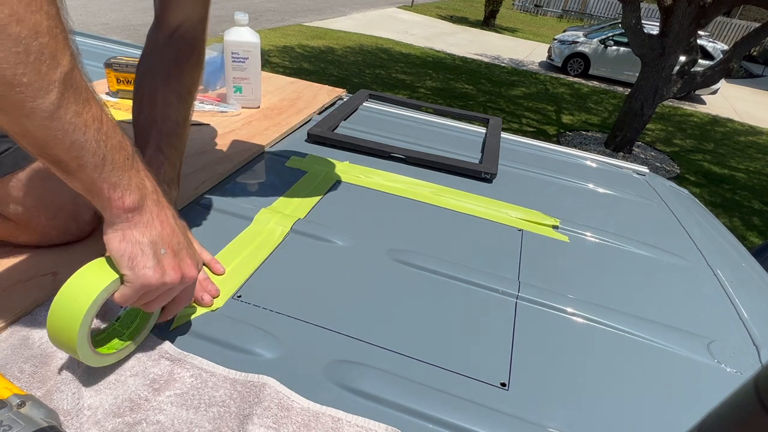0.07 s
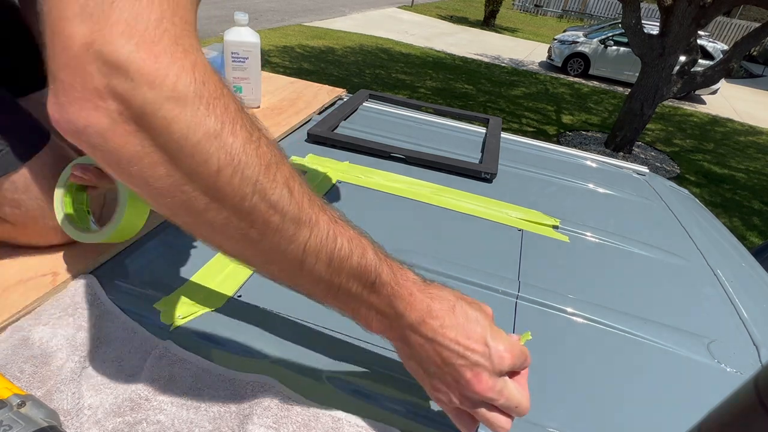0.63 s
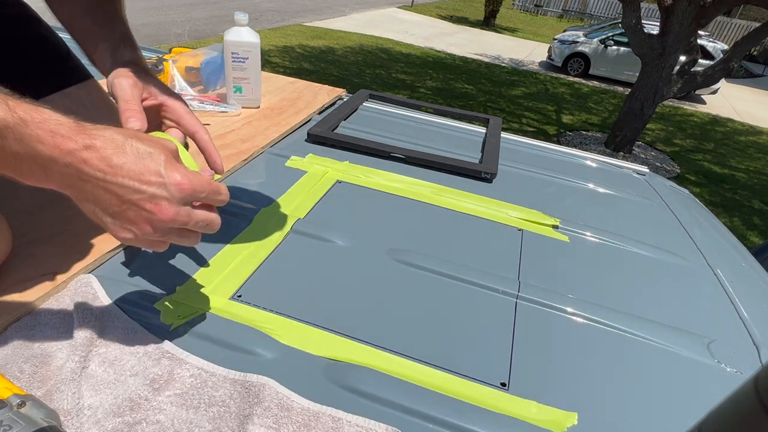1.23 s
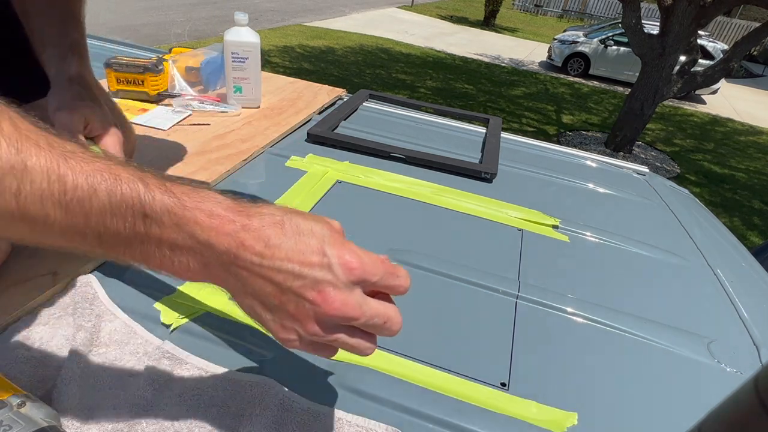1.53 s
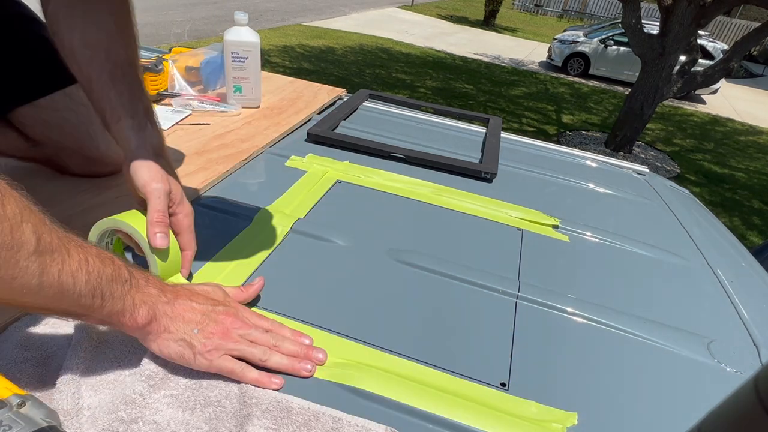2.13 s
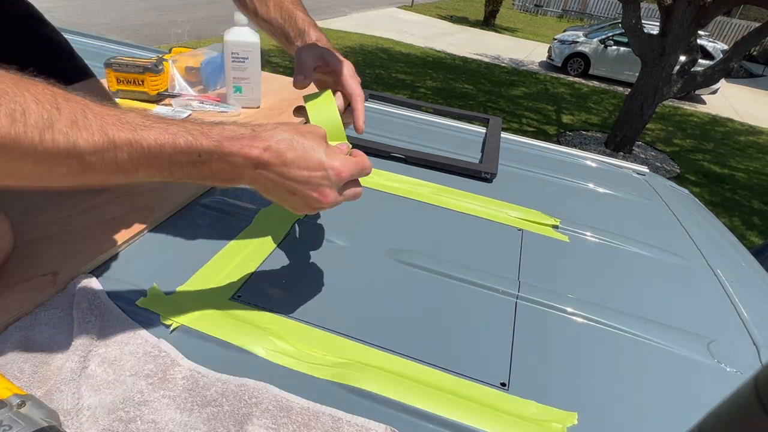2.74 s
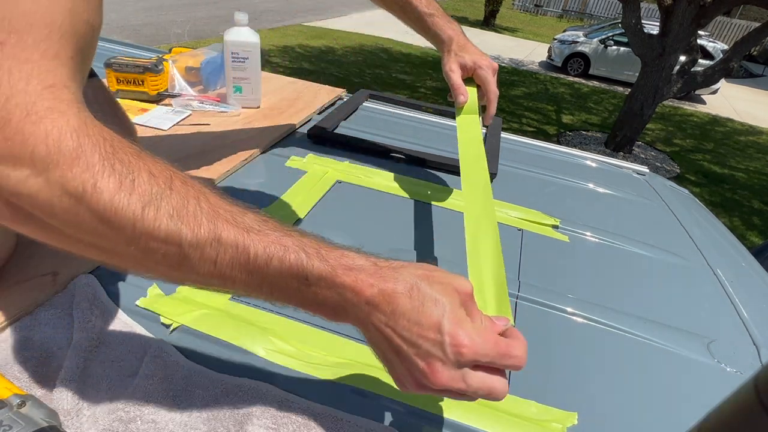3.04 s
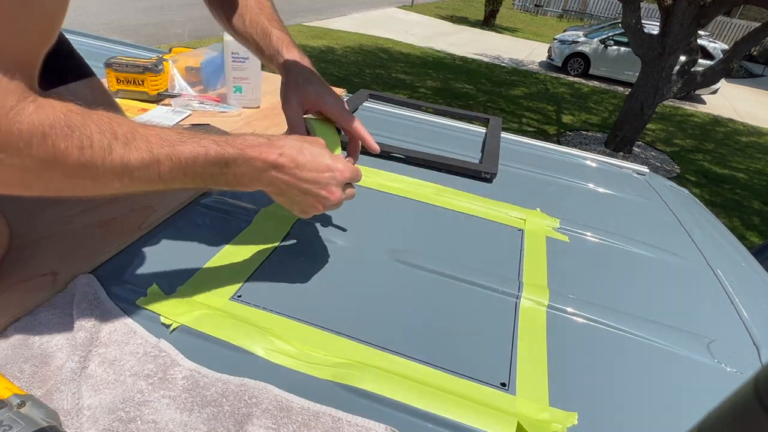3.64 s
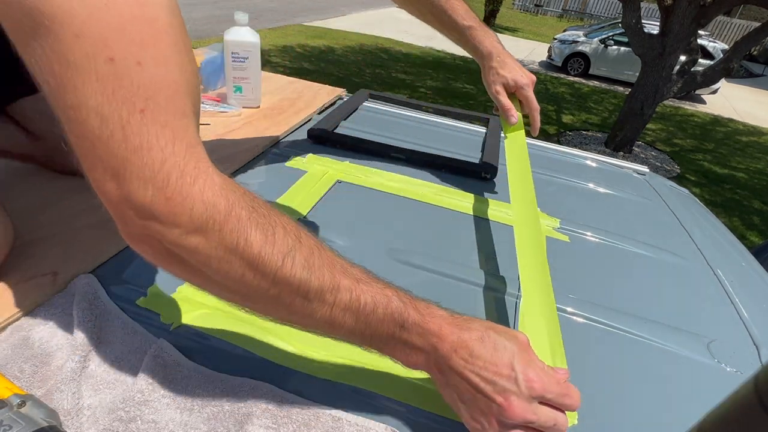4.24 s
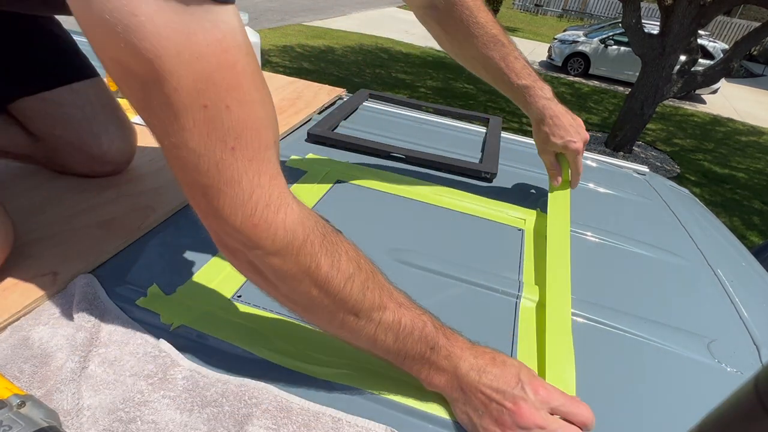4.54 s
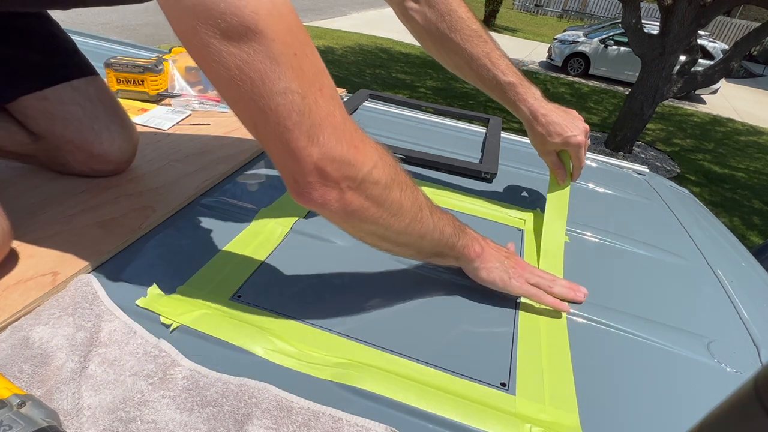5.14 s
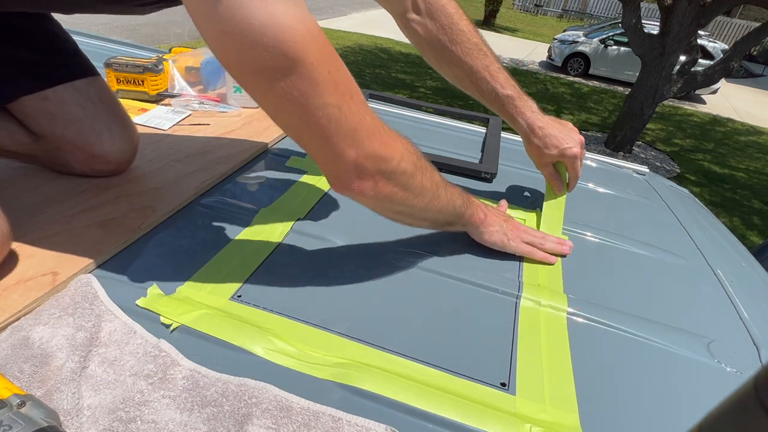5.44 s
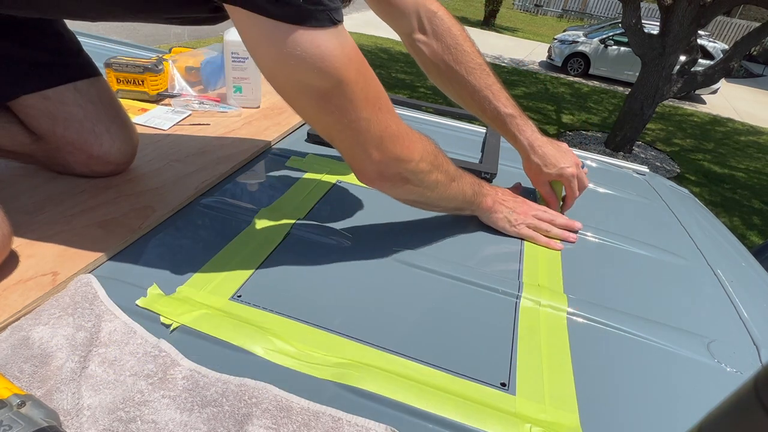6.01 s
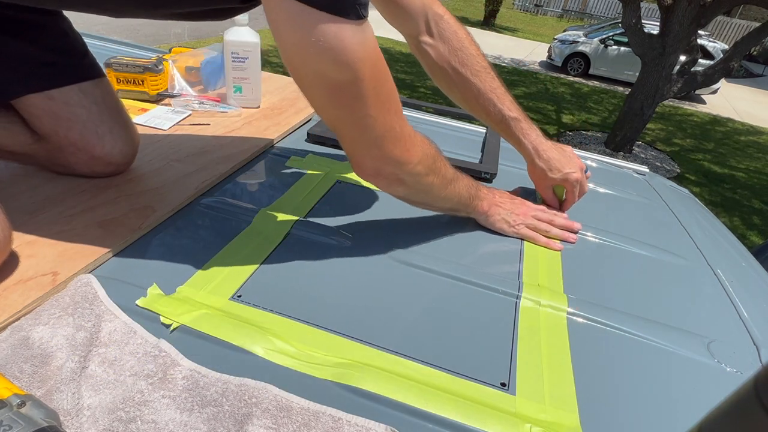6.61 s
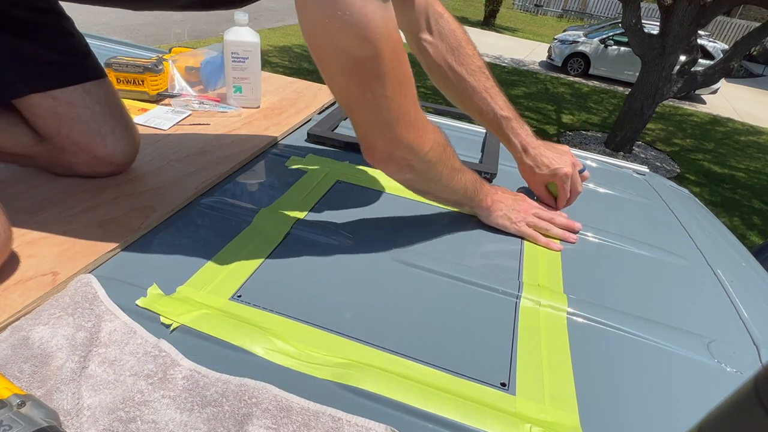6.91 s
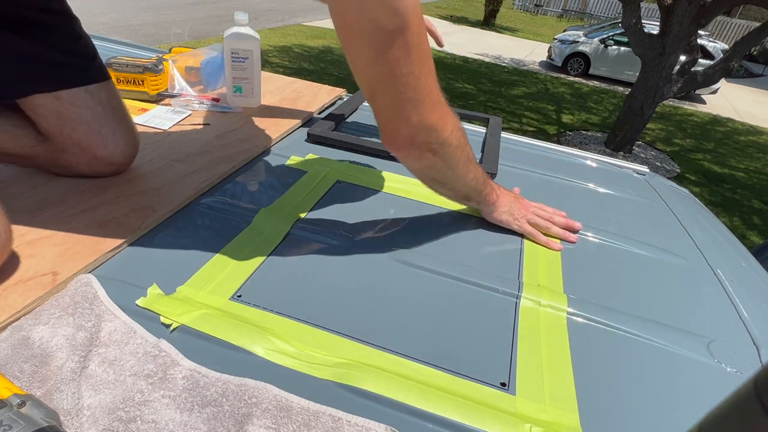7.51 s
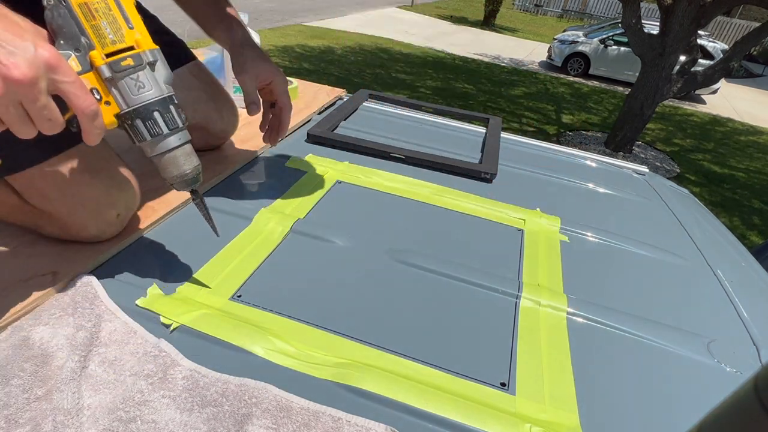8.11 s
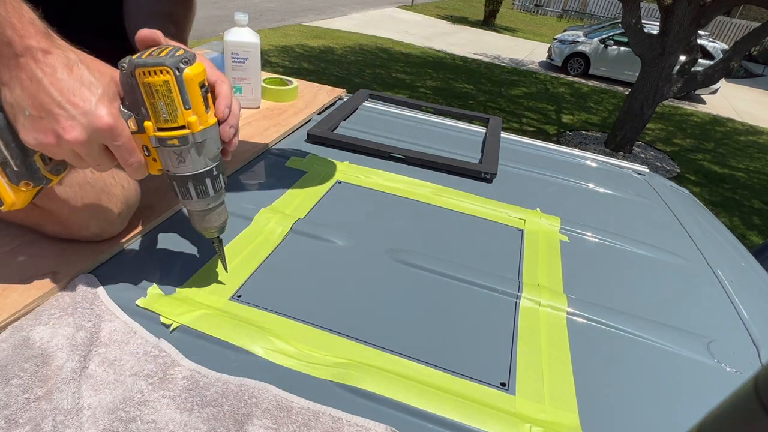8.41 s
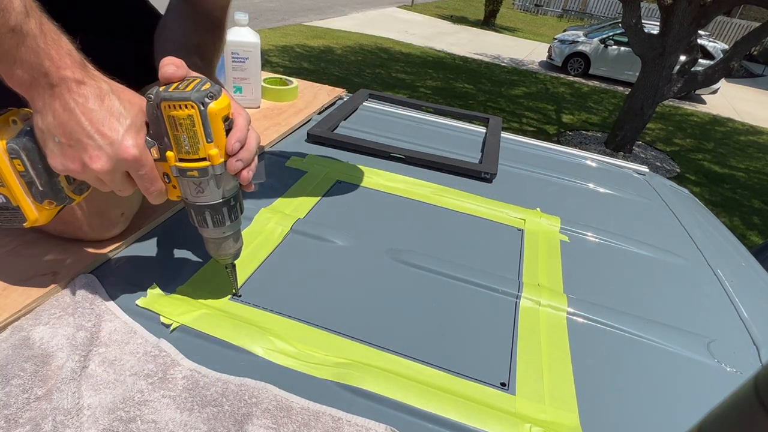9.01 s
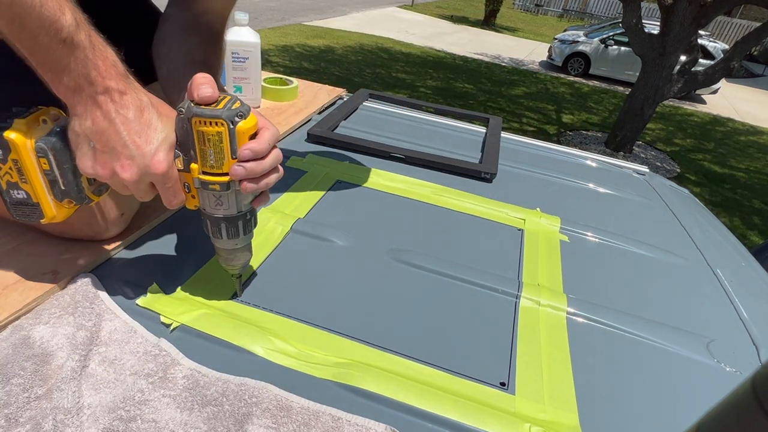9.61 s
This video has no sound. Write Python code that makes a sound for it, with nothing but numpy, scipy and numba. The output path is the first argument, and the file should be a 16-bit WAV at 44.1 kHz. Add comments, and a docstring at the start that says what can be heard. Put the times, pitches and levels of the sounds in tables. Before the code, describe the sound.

Masking tape is worked close to the microphone on a steel van roof, over a low, restless outdoor rumble and a faint drone. Four loud rasping pulls come off the roll at about 0.2, 1.2, 2.7 and 3.8 seconds, each roughly half a second long and falling in tone. Sharp ticks and short papery tears come between them, near 0.9, 1.9 and 2.2 seconds, with faint crinkling. From 3.2 to 7.4 seconds a palm softly smooths the tape down, with small squeaks around 3.3 seconds and occasional dull bumps and ticks. After a lull, a cordless drill is set on the roof at 8.9 seconds, and the panel gives several hollow booms, strongest around 9.2. At 9.5 seconds the bit starts biting into the sheet metal with a scrape, brief high squeals, sharp clicks and a light gear whine, just before the end.

```python
"""Masking tape work on the steel roof of a van, outdoors, close to a phone; low rumble throughout.
0.2-4.2 s: four pulls off the roll, short tears between. The glue lets go in tiny snaps that ring the
free strip, whose resonances fall as it grows longer. 3.2-7.4 s: a palm smooths the tape down.
8.9 s: a cordless drill is set on the roof, which booms. 9.5 s: its bit starts to bite into the sheet."""
import sys
import numpy as np
from scipy import signal
from scipy.fft import rfft, irfft, next_fast_len
from scipy.io import wavfile
from scipy.ndimage import map_coordinates
from numba import njit

SR = 44100
rng = np.random.default_rng(int(sys.argv[2]) if len(sys.argv) > 2 else 0)


def persist_wave(psi):
    """Save psi, clipped to +-1, as 16-bit WAV."""
    counts = np.round(np.clip(psi, -1, 1) * 32767).astype(np.int16)
    wavfile.write(sys.argv[1], SR, np.atleast_2d(counts).T)


N = 429975
T = np.arange(N) / SR
TOP_HZ = 15900


def tape_pulls(snaps_per_s=7000, draw_s=0.1802, first_trip_ms=0.11, echo_limit_ms=0.63, surge_width_s=0.057):
    """Tape creeps, runs free and brakes. Glue snaps ring the lengthening strip; the roof echoes it."""
    # (start [s], runs free [s], surge [s], stop [s], speed-up [s], braking [s], round-trip growth [ms/s],
    #  body [dB], rasp [dB], fizz [dB], surge [dB], sag [dB/s])
    pulls = [(0.165, 0.232, 0.45, 0.73, 0.09, 0.086, 20.1, -24.5, -21.5, -24.5, 4, 6.5),
             (1.136, 1.25, 1.42, 1.641, 0.057, 0.1, 24.2, -28, -19, -28, 4, 10),
             (2.617, 2.74, 2.92, 3.14, 0.091, 0.079, 13.5, -22, -19.5, -23, 5, 16),
             (3.678, 3.813, 4.06, 4.235, 0.1, 0.089, 16.4, -24.5, -17, -23.5, 6, 15)]
    # per pull: (frequency [Hz], relative level [dB])
    spectra = [
        [(150, -43), (250, -11), (444, 2), (775, 3.5), (2710, 1.5), (5540, 2), (8850, -20.5), (10400, -24),
         (11900, -17.5), (13700, -23), (14900, -24), (16000, -19.5)],
        [(150, -57), (320, -8.5), (501, -4), (875, 0.5), (1080, -6), (2530, -11.5), (5160, -5), (6590, -7),
         (10200, -28.5), (11900, -6), (13900, -24), (16000, -11.5)],
        [(150, -53), (250, -20), (528, -7.5), (802, -4), (1280, -15), (2240, -5), (2910, -7), (8700, -16),
         (10400, -18), (12100, -11), (13700, -19.5), (16000, -19.5)],
        [(150, -60), (250, -8.5), (468, 2), (831, 3.5), (1610, -8.5), (2360, -1.5), (3060, -4.5), (7980, -11),
         (10400, -17.5), (11900, -8), (13700, -19), (16000, -18)],
    ]
    speed_powers, surge_shares = (1.29, 1.31, 0.93), (0.9, 0.1, 0.55)  # body, rasp, fizz
    out = np.zeros((2, N))
    for pull, spectrum in zip(pulls, spectra):
        start, free, surge_s, stop, rise_s, brake_s, growth_ms_per_s, *levels_db, peak_db, sag_db_per_s = pull
        t = span(start, stop)
        creep = 0.025 + 0.095 * ramp(t, start, free - start)  # share of full speed
        speed = (creep + (1 - creep) * ramp(t, free, rise_s)) * (1 - ramp(t, stop - brake_s, brake_s))
        drawn_s = np.cumsum(creep + (1 - creep) * ramp(t, free, draw_s)) / SR
        trip_ms = first_trip_ms + growth_ms_per_s * drawn_s
        echo_ms = echo_limit_ms * np.tanh(0.9 * trip_ms / echo_limit_ms)  # later as the strip lifts
        trip_ms *= 1 + 0.035 * walk(len(t), 60)  # tension flutter
        glue = snaps(len(t), snaps_per_s, spread_db=2.5) * undb(0.27 * walk(len(t), 170))
        damp_hz = 800 + 0.41 * 1000 / trip_ms  # only the lowest modes ring on
        pole = np.exp(-2 * np.pi * damp_hz / SR)
        trip_samples = trip_ms * SR / 1000 - pole / (1 - pole)  # less the damping's own lag
        strip = strip_ring(glue, trip_samples, pole, feedback=0.74)
        strip = band(strip - 0.079 * delay(strip, echo_ms), 190, "high", order=1)
        surge_db = peak_db * np.exp(-((t - surge_s) / surge_width_s) ** 2)
        sag_db = sag_db_per_s * np.maximum(t - free, 0)
        gains = [speed ** power * undb(db + share * surge_db - sag_db)
                 for db, power, share in zip(levels_db, speed_powers, surge_shares)]
        add(out, start, mix_bands(colour(ports(strip, t), spectrum), gains))
    return out


@njit
def strip_ring(x, trip_samples, pole, feedback):
    """Waves run to and fro on the taut strip, inverted and duller after every trip."""
    y, dulled = x.copy(), 0.
    for i in range(len(x)):
        at = i - trip_samples[i]
        if at >= 0 and trip_samples[i] > 1:
            k = int(at)
            returned = y[k] + (at - k) * (y[k + 1] - y[k])
            dulled += (1 - pole[i]) * (returned - dulled)
            y[i] -= feedback * dulled
    return y


def tape_tears(snaps_per_s=6500, bunch_hz=190, edge_s=0.00772, straggle_s=0.033, straggle_share=0.24):
    """Paper fibres break in quick, nearly regular bunches; a few give way before and after the tear."""
    # tugs and tears: (time [s], length [s], body [dB], rasp [dB], fizz [dB])
    tears = [(0.93, 0.027, -34, -27.5, -31), (1.895, 0.05, -32, -30.5, -27),
             (2.234, 0.094, -35.5, -21, -31.5), (7.036, 0.091, -58.5, -60, -55.5)]
    # (frequency [Hz], relative level [dB])
    spectrum = [(88, -25), (150, -6.5), (494, -1.5), (578, -4.5), (998, -0.5), (1210, -7.5), (1720, -9),
                (1900, -7), (3620, -6.5), (7180, -17), (10200, -43), (11900, -16), (13700, -42),
                (16000, -23.5)]
    out = np.zeros((2, N))
    for start, length, *levels_db in tears:
        t = span(start - 4 * straggle_s, start + length + 4 * straggle_s)
        outside_s = np.abs(t - np.clip(t, start, start + length))
        effort = (1 - straggle_share) * np.exp(-outside_s / edge_s)
        effort += straggle_share * np.exp(-outside_s / straggle_s)
        bunch_phase = np.cumsum(bunch_hz * (1 + 0.25 * walk(len(t), 80))) / SR % 1
        fibres = snaps(len(t), snaps_per_s, spread_db=2.3) * (0.24 + np.exp(-bunch_phase / 0.3))
        rip = colour(ports(fibres, t, scatter_db=-2.5), spectrum)
        add(out, t[0], mix_bands(rip, [effort * undb(db) for db in levels_db]))
    return out


def drill(start_s=9.495, spin_up_s=0.02, bite_s=0.085, lip_hz=48, gear_hz=740, sag_hz_per_s=111):
    """After a jolt the bit's two lips scrape off chips in turn and squeal; the gears whine and slow."""
    # cutting: (frequency [Hz], relative level [dB])
    spectrum = [(35, -36.5), (60, 0), (133, -3), (666, -10), (732, -5.5), (862, -10), (968, -7),
                (2580, -10.5), (3040, -5), (4120, -6.5), (7230, -11), (10000, -35.5), (11500, -18.5),
                (13900, -36), (16000, -24)]
    # the edge catching: (time [s], pitch [Hz], level [dB], half width [s])
    catches = [(9.6, 3160, -13, 0.0059), (9.601, 7270, -14, 0.0049), (9.578, 11480, -18.5, 0.0026),
               (9.653, 3810, -30, 0.0074), (9.695, 3000, -34, .01), (9.725, 2660, -26, 0.0062)]
    levels_db, bite_powers = (-35.5, -24.5, -26.5), (0.21, 1.1, 1.6)  # body, rasp, fizz
    t = span(start_s, T[-1])
    age, bite = t - start_s, ramp(t, start_s, bite_s)
    jolt = undb(-2.5) * np.exp(-((age - 0.012) / 0.0083) ** 2)
    throb_db = 1.5 * np.sin(2 * np.pi * lip_hz * t)
    chips = snaps(len(t), 9000, spread_db=3) * undb(throb_db + walk(len(t), 282))
    gains = [undb(db) * (bite ** power + jolt) for db, power in zip(levels_db, bite_powers)]
    cut = mix_bands(colour(ports(chips, t, scatter_s=0.0031, sway_hz=6.1), spectrum), gains)
    for s, hz, db, width_s in catches:
        squeal = np.sin(2 * np.pi * np.cumsum(hz * (1 + 0.038 * walk(len(t), 1500))) / SR)
        cut += ports(squeal * undb(db) * np.exp(-((t - s) / width_s) ** 2), t)
    whine_hz = gear_hz * (1 - np.exp(-age / spin_up_s)) - sag_hz_per_s * age
    out = tone(t, whine_hz, bite * undb(-36.5), jitter=0.015, flutter_db=3.5, db_per_oct=-2.5, count=4)
    add(out, start_s, cut)
    return out


def roof_bumps(crunch_gain=1.53, crunch_s=0.054):
    """Hands, knees and the drill ring the damped roof panel; softer blows reach only its low modes."""
    # (time [s], peak [dB], hardness [Hz])
    blows = [(1.67, -33, 140), (4.202, -31, 148), (4.39, -41.5, 169), (4.999, -33.5, 600),
             (5.532, -35, 130), (5.819, -34, 304), (6.988, -28.5, 900), (8.931, -25.5, 510),
             (8.977, -26.5, 198), (9.15, -21.5, 486), (9.189, -15.5, 700), (9.228, -12, 480),
             (9.25, -16.5, 90), (9.506, -21.5, 700), (9.535, -20.5, 350), (9.572, -23, 150)]
    # (frequency [Hz], relative level [dB], t60 [s])
    modes = [(54.7, -6, 0.34), (75, -14, 0.22), (127.4, 1.5, 0.17), (140, -9.5, 0.23), (173.4, 0, 0.076),
             (249, 2, 0.12), (283, -0.5, 0.13), (365.3, -2.5, 0.13), (434, -4.5, 0.094), (520, -5.5, 0.13),
             (588, -5, 0.088), (830, -35, .06), (1090, -6, 0.088), (1366, -1, 0.047)]
    out, age = np.zeros((2, N)), T[:SR // 3]
    for s, db, hardness_hz in blows:
        ring = np.zeros(len(age))
        for hz, mode_db, t60 in modes:
            envelope = rng.choice([-1, 1]) * undb(mode_db + 2 * rng.standard_normal() - 60 * age / t60)
            ring += envelope * np.sin(2 * np.pi * hz * (1 + 0.041 * rng.standard_normal()) * age)
        crunch = crunch_gain * rng.standard_normal(len(age)) * np.exp(-age / crunch_s)
        boom = band(ring + crunch, 1.3 * hardness_hz, "low")
        add(out, s, ports(boom, s + age) * undb(db) / np.abs(boom).max())
    return out


def ticks(decay_s=0.00073, gain_db=2):
    """Tape snaps, fingers and chips tick: short cracks, each with its own brightness."""
    # (time [s], peak before gain_db [dB], brightness [Hz])
    cracks = [(0.8974, -17, 2900), (0.9296, -26, 3110), (0.9537, -19, 4350), (1.0136, -30, 4730),
              (1.142, -36, 4300), (1.2728, -11.5, 5300), (2.204, -30, 3570), (2.2267, -25, 3520),
              (2.5758, -23.5, 6100), (3.5925, -33, 6000), (3.684, -33, 7320), (5.2435, -42.5, 1660),
              (6.5014, -38.5, 8940), (6.9205, -40.5, 2970), (6.987, -28, 1560), (7.036, -32.5, 2000),
              (7.1154, -32.5, 6500), (7.3738, -38, 6040), (8.931, -46, 1500), (9.189, -40, 1300),
              (9.2268, -29, 2500), (9.504, -36, 6950), (9.5746, -11, 3250), (9.678, -10, 7020)]
    out, age = np.zeros((2, N)), T[:SR // 16]
    for s, db, hz in cracks:
        crack = rng.standard_normal(len(age)) * np.exp(-age / decay_s)
        pair = ports(band(crack, [hz / 1.9, hz * 1.24], "band", order=1), s + age, scatter_db=5)
        add(out, s, pair * undb(db + gain_db) / np.abs(pair.mean(axis=0)).max())
    return out


def squeaks():
    """Skin and glue squeak in short gliding tones."""
    # (time [s], length [s], first pitch [Hz], last pitch [Hz], level [dB])
    glides = [(2.065, 0.06, 950, 780, -46), (3.276, 0.11, 2010, 1834, -42.5),
              (3.345, 0.1, 1760, 1617, -37.5), (4.977, 0.08, 506, 783, -50)]
    return sum(glide(row, jitter=0.036, flutter_db=2.5, db_per_oct=-5, count=5) for row in glides)


def bit_skates():
    """The tip of the bit skates on the tape as it is placed."""
    # (time [s], length [s], level [dB])
    skates = [(8.918, 0.098, -52.5), (9.138, 0.027, -44.5), (9.18, 0.095, -37)]
    # (frequency [Hz], relative level [dB])
    spectrum = [(240, -34), (400, -16), (504, -12.5), (553, -14), (1420, -18), (4240, -23), (16000, -50)]
    return slides(skates, spectrum, uneven_db=7)


def palm_rubs():
    """A palm hisses over the tape, smoothing it down."""
    # (time [s], length [s], level [dB])
    rubs = [(3.24, 0.23, -48), (4.97, 0.083, -55.5), (5.24, 0.37, -59), (5.8, 0.12, -60.5),
            (7.21, 0.16, -57)]
    # (frequency [Hz], relative level [dB])
    spectrum = [(590, -59), (1000, -28), (1690, -19), (2650, -9.5), (3420, -13), (8450, -14.5),
                (10100, -20), (16000, -17.5)]
    return slides(rubs, spectrum, uneven_db=5)


def tape_crinkles(snaps_per_s=1200, uneven_db=3):
    """Loose tape crackles faintly between the fingers."""
    # (time [s], length [s], level [dB])
    crinkles = [(0.678, 0.1, -53), (1.602, 0.1, -55.5), (1.991, 0.43, -52.5), (3.098, 1, -59.5),
                (4.17, 0.12, -56.5)]
    out = np.zeros((2, N))
    for start, length, db in crinkles:
        t, gain = stroke(start, length)
        crackles = band(snaps(len(t), snaps_per_s, spread_db=6.5), [2500, 13000], "band", order=1)
        add(out, start, unit(ports(crackles, t)) * gain * undb(db + uneven_db * walk(len(t), 19.4)))
    return out


def outdoors(rumble_gain_db=3, air_db=-56.5, shrill_db=-71):
    """Still suburban air: a restless rumble, a wavering drone, a thin shrill hiss and a brief whistle."""
    # (time [s], level before rumble_gain_db [dB])
    rumble_levels = [(0, -47), (0.55, -46), (1.1, -49), (2.36, -41), (3.0, -55.5), (3.5, -47.5),
                     (4.15, -40.5), (4.85, -47.5), (5.3, -46), (6.1, -48.5), (7.66, -46), (7.87, -54.5),
                     (8.35, -59.5), (8.85, -46), (9.75, -43)]
    # both: (frequency [Hz], relative level [dB])
    rumble_spectrum = [(21, -37.5), (35, -2), (59, 2), (97, 0), (134, -4.5), (166, -5), (255, -11.5),
                       (280, -13.5), (440, -19.5), (600, -31), (780, -54), (1320, -120)]
    air_spectrum = [(18, -52.5), (30, -10), (76, -8.5), (384, -6), (415, -7), (497, -5.5), (629, -7.5),
                    (680, -7), (1240, -11.5), (2190, -13), (3230, -19.5), (7430, -17.5), (13900, -47.5),
                    (15000, -37.5)]
    # (time [s], pitch [Hz], level [dB])
    drone_track = [(0, 105.5, -49), (2.1, 108, -58.5), (3.7, 121.7, -55), (4.9, 137.1, -54.5),
                   (6.3, 132.4, -49), (7.75, 135.2, -52.5), (7.9, 134, -69.5)]
    # (time [s], length [s], first pitch [Hz], last pitch [Hz], level [dB])
    whistle_glide = (4.22, 0.58, 6560, 6440, -66)
    rumble_db, = curves(rumble_levels, T)
    rumble = colour(rng.standard_normal(N) + 2 * rng.standard_normal((2, N)), rumble_spectrum)
    air = colour(rng.standard_normal(N) + 2 * rng.standard_normal((2, N)), air_spectrum)
    shrill = unit(band(rng.standard_normal((2, N)), [7150, 7700], "band")) * undb(shrill_db)
    t = span(0, drone_track[-1][0])
    drone_hz, drone_db = curves(drone_track, t)
    drone = tone(t, drone_hz, undb(drone_db), jitter=0.06, flutter_db=2.5, db_per_oct=-13, count=2)
    whistle = glide(whistle_glide, jitter=0.0214, flutter_db=8, db_per_oct=0, count=1)
    rumble *= undb(rumble_db + rumble_gain_db + 2 * walk(N, 9))
    air *= undb(air_db + 0.33 * walk(N, 5))
    return rumble + air + shrill + drone + whistle


def ports(x, t, scatter_db=-1, scatter_s=0.0023, sway_hz=14, paths=4):
    """Two microphone ports: the left mostly leads; moving arms scatter the treble differently to each."""
    # direction of the work: (time [s], left lead [ms], treble left minus right [dB])
    bearing = [(0.3, 0.17, 7.5), (0.55, .23, 1), (1.45, 0.21, 5.5), (2.3, 0.24, 3.5), (2.75, 0.15, 4.5),
               (2.95, 0.0022, -1), (3.4, 0.091, 3), (3.87, 0.062, 3.5), (4.1, 0.026, -0.5),
               (7.4, -0.034, 0), (8.9, 0.22, 4), (9.75, 0.25, 4.5)]
    lead_ms, pan_db = curves(bearing, t)
    age, treble = T[:SR // 40], band(x, 1500, "high")
    pair = np.array([x, delay(x, lead_ms)])
    for port in pair:
        echoes = rng.standard_normal((paths, len(age))) * np.exp(-age / scatter_s)
        echoes /= np.linalg.norm(echoes, axis=1, keepdims=True)
        shares = np.array([walk(len(t), sway_hz) for _ in range(paths)])
        shares /= np.linalg.norm(shares, axis=0)  # constant-power crossfade
        scattered = signal.fftconvolve(treble[None], echoes, axes=1)[:, :len(t)]
        port += undb(scatter_db) * np.sum(shares * scattered, axis=0)
    bass = band(pair, 900, "low", order=1)
    side_db = np.array([pan_db, -pan_db]) / 2
    # the phone's body shades the treble more than the bass
    return bass * undb(0.5 * side_db) + (pair - bass) * undb(side_db)


def mix_bands(pair, gains, body_hz=1500, fizz_hz=8000):
    """Split a scrape into body, rasp and fizz; normalise each and apply its gain."""
    body = band(pair, body_hz, "low", order=4)
    rasp = band(pair, [body_hz, fizz_hz], "band", order=4)
    fizz = band(pair, fizz_hz, "high", order=4)
    return sum(gain * part / np.std(part.mean(axis=0)) for part, gain in zip((body, rasp, fizz), gains))


def snaps(size, per_s, spread_db):
    """Dense tiny clicks of uneven size, at rms 1."""
    sizes = undb(spread_db * np.minimum(rng.exponential(size=size), 4))
    return unit((rng.random(size) < per_s / SR) * sizes * rng.standard_normal(size))


def slides(rows, spectrum, uneven_db):
    """Uneven hiss of strokes over the crepe of the tape."""
    out = np.zeros((2, N))
    for start, length, db in rows:
        t, gain = stroke(start, length)
        hiss = colour(ports(rng.standard_normal(len(t)), t), spectrum)
        add(out, start, hiss * gain * undb(db + uneven_db * walk(len(t), 81)))
    return out


def glide(row, **timbre):
    """A tone that swells and fades while its pitch slides."""
    start, length, first_hz, last_hz, db = row
    t, gain = stroke(start, length)
    return tone(t, np.linspace(first_hz, last_hz, len(t)), gain * undb(db), **timbre)


def tone(t, hz, gain, jitter, flutter_db, db_per_oct, count):
    """A wavering stack of harmonics."""
    out = np.zeros((2, N))
    phase = 2 * np.pi * np.cumsum(hz * (1 + jitter * walk(len(t), 600))) / SR
    harmonics = [k for k in range(1, count + 1) if k * hz.max() < TOP_HZ]
    stack = sum(undb(db_per_oct * np.log2(k)) * np.sin(k * phase) for k in harmonics)
    add(out, t[0], unit(ports(stack, t)) * gain * undb(flutter_db * walk(len(t), 55)))
    return out


def stroke(start, length):
    """Times and gain of a rounded swell and fade."""
    t = span(start, start + length)
    return t, np.abs(np.sin(np.pi * ramp(t, start, length))) ** 0.46


def colour(x, spectrum):
    """Filter x by (Hz, dB) points, to rms 1."""
    hz, db = np.transpose(spectrum)
    size = next_fast_len(x.shape[-1])
    bins_hz = np.maximum(np.arange(size // 2 + 1) * SR / size, 1)
    gain = undb(np.interp(np.log(bins_hz), np.log(hz), db))
    return unit(irfft(rfft(x, size) * gain, size)[..., :x.shape[-1]])


def band(x, hz, kind, order=2):
    """Butterworth filter."""
    return signal.sosfilt(signal.butter(order, np.minimum(hz, 0.45 * SR), kind, fs=SR, output="sos"), x)


def walk(size, rate_hz):
    """Random values joined by straight lines."""
    position = np.arange(size) * rate_hz / SR
    count = int(position[-1]) + 2
    return 0.73 * np.interp(position, np.arange(count), rng.standard_normal(count))


def delay(x, ms):
    """Time-varying delay."""
    return map_coordinates(x, [np.arange(len(x)) - ms * SR / 1000], order=3)


def curves(rows, t):
    """Table columns interpolated at times t."""
    s, *columns = np.transpose(rows)
    return [np.interp(t, s, column) for column in columns]


def ramp(t, start, length):
    """Linear rise from 0 to 1."""
    return np.clip((t - start) / length, 0, 1)


def span(start, stop):
    """Sample times from start to stop."""
    return T[(T >= start) & (T <= stop)]


def add(out, s, x):
    """Mix x into out from time s."""
    i = max(int(round(s * SR)), 0)
    out[..., i:i + x.shape[-1]] += x[..., :N - i]


def undb(db):
    """Decibels to gain."""
    return 10 ** (np.asarray(db) / 20)


def unit(x):
    """Scale to rms 1."""
    return x / np.sqrt(np.mean(x ** 2) + 1e-18)


def scene():
    """Tape work, then the drill, over outdoor air."""
    friction = squeaks() + palm_rubs() + bit_skates()
    tape = tape_pulls() + tape_tears() + tape_crinkles()
    return friction + tape + ticks() + roof_bumps() + drill() + outdoors()


def record(dry):
    """The phone sheds deep bass, its ducts notch the treble twice, peaks saturate, the top is cut off."""
    # (centre [Hz], half width [Hz], gain [dB])
    ducts = [(10380, 320, -11), (12000, 3600, 2.5), (13900, 380, -17.5), (15000, 600, 6.5)]
    bins_hz = np.arange(N // 2 + 1) * SR / N
    gain = undb(sum(db * np.exp(-((bins_hz - hz) / width_hz) ** 2) for hz, width_hz, db in ducts))
    ducted = irfft(rfft(band(dry, 48, "high", order=4)) * gain, N)
    return signal.sosfilt(signal.ellip(10, 0.2, 70, TOP_HZ, fs=SR, output="sos"), np.tanh(ducted))


dry = scene()
out = record(dry)
persist_wave(out)
```